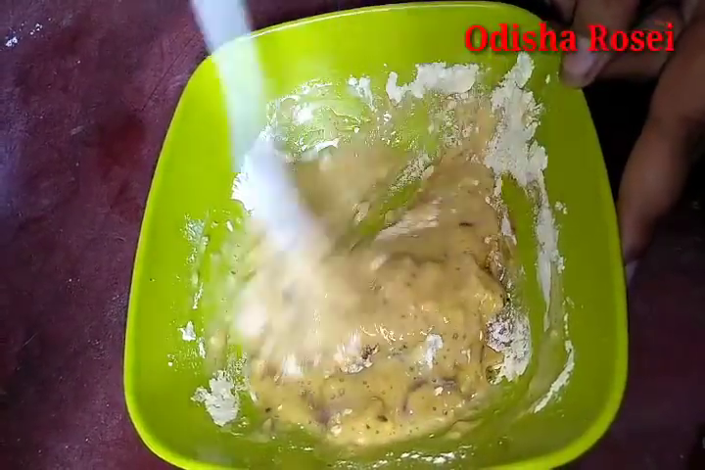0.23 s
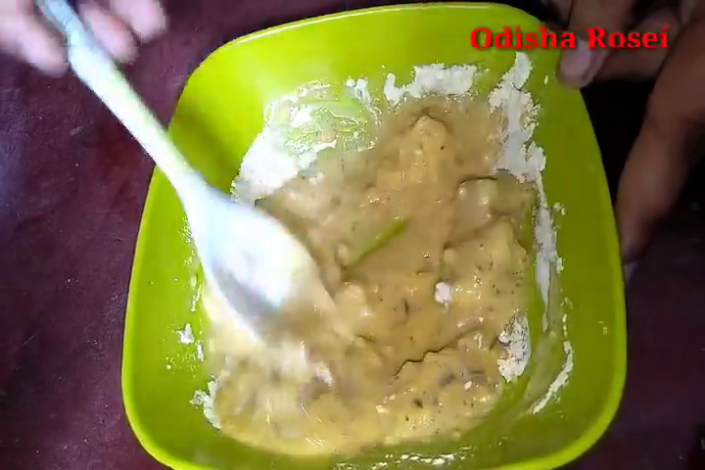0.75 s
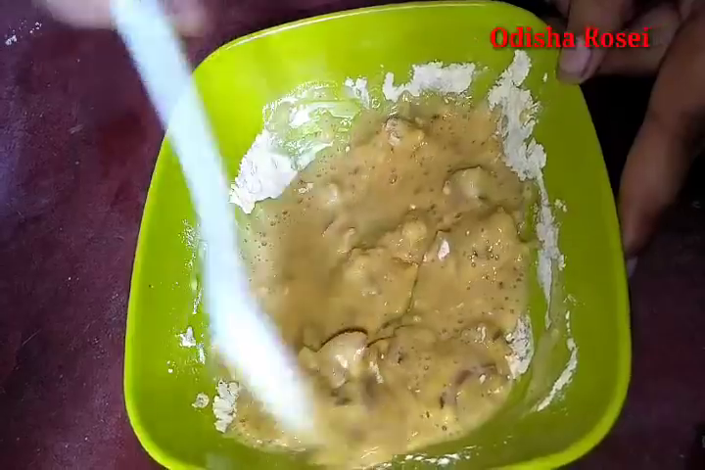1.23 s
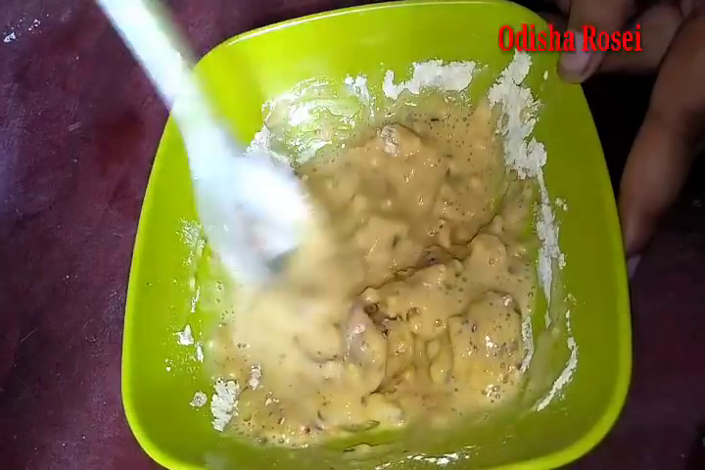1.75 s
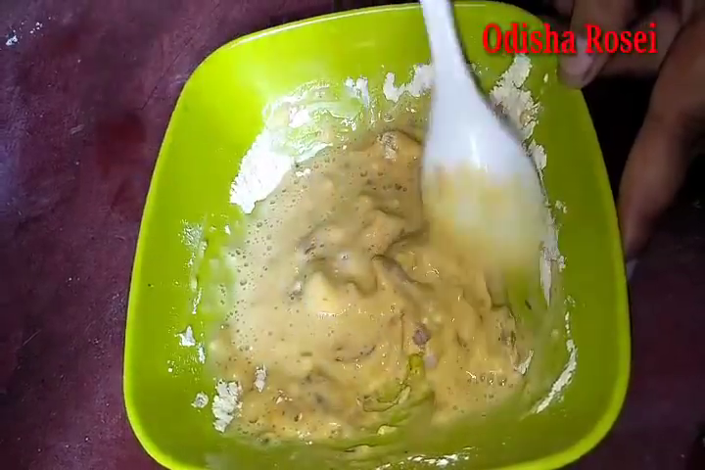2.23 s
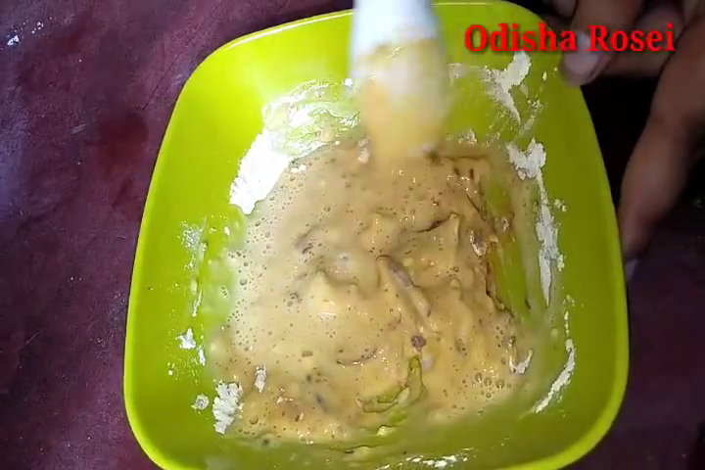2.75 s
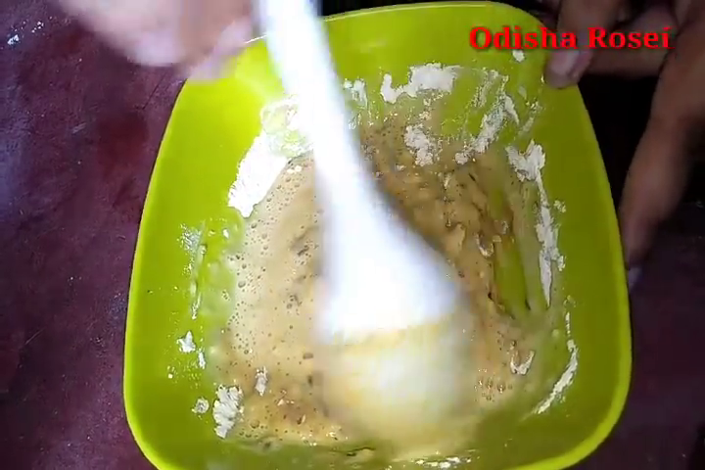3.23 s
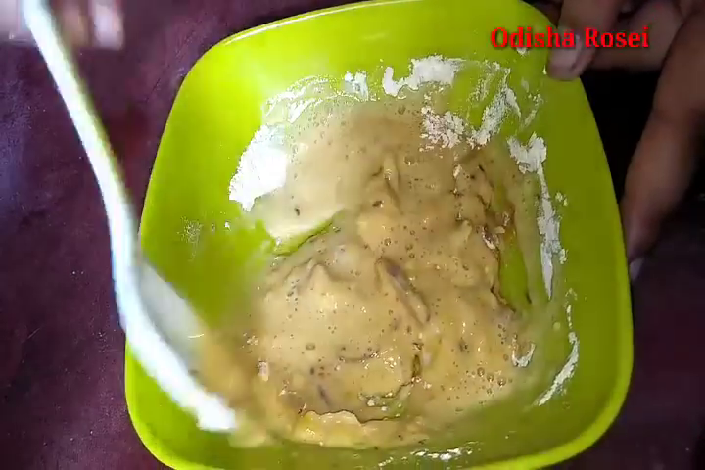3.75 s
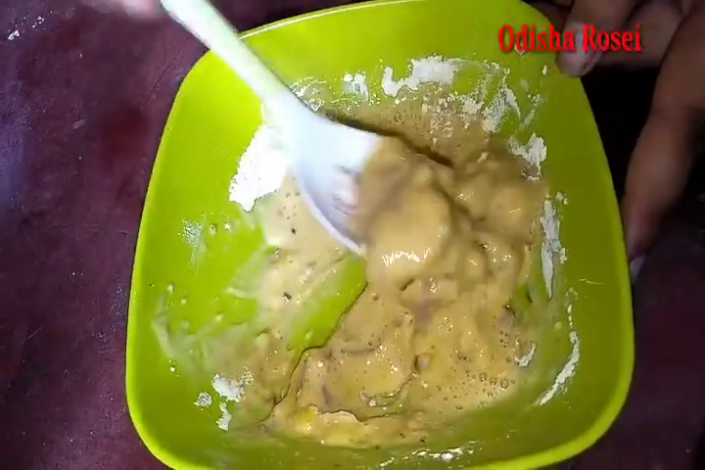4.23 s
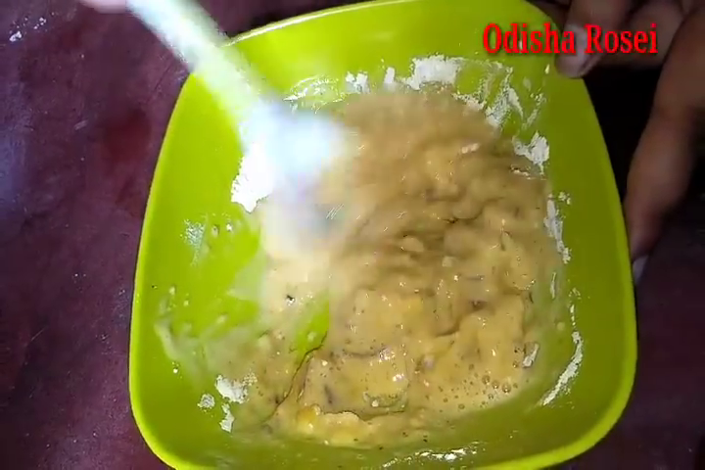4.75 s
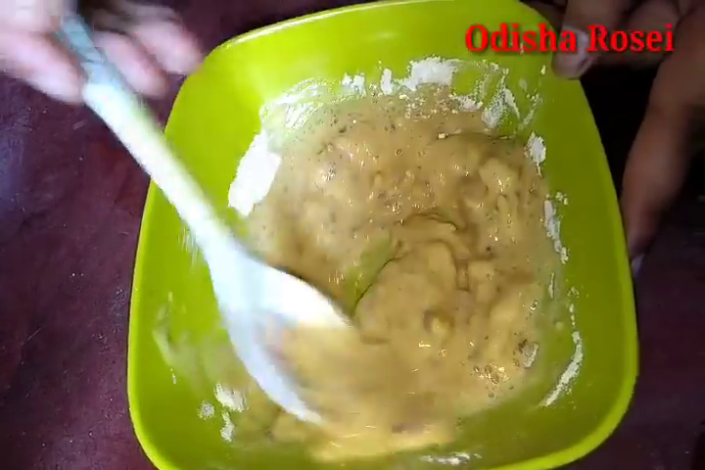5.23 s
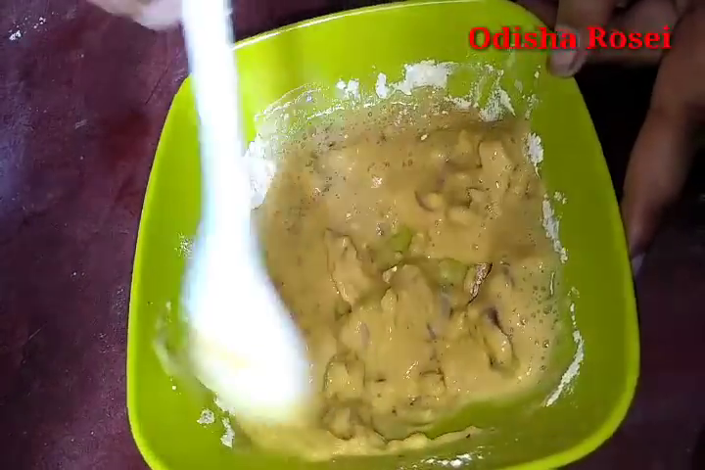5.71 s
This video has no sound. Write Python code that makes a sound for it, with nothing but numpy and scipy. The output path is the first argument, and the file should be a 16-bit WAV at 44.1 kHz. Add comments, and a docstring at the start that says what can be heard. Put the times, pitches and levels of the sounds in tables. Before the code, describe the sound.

A plastic spoon stirs thick wet batter in a plastic bowl, squelching and knocking against the wall over a faint low hum.

```python
"""A small kitchen, close to a plastic bowl in which a plastic spoon stirs thick batter.
The spoon knocks and judders on the wall and rings its damped modes, dull where batter cushions it
and sharp where it is bare. Torn air pockets ring as squelches and wet films snap as crackle.
Behind it: a low hum, faint hiss, a thin whine and one far chirp."""
import sys
import numpy as np
from scipy import signal
from scipy.fft import rfft, irfft, next_fast_len
from scipy.io import wavfile
from scipy.ndimage import map_coordinates

SR = 44100
rng = np.random.default_rng(int(sys.argv[2]) if len(sys.argv) > 2 else 0)


def wav_record(signal):
    """Record a signal, one row per channel, as 16-bit PCM in the file named by sys.argv[1]."""
    frames = np.transpose(np.atleast_2d(signal))
    bounded = np.clip(frames, -1, 1)
    # unit amplitude maps onto the largest positive 16-bit level
    quanta = np.round(bounded * 32767).astype(np.int16)
    wavfile.write(sys.argv[1], SR, quanta)


N = 263788


def amp(db):
    """Decibels to gain."""
    return 10 ** (np.asarray(db) / 20)


def unit(x):
    """Scale to rms 1."""
    return x / np.sqrt(np.mean(x ** 2) + 1e-20)


def along(points, hz):
    """Read (Hz, value) points on a log frequency axis."""
    point_hz, values = np.transpose(points)
    return np.interp(np.log(hz + 1), np.log(point_hz + 1), values)


def curves(rows):
    """One value per sample for each column after the time."""
    times_s, *columns = np.transpose(rows)
    return [np.interp(np.arange(N) / SR, times_s, column) for column in columns]


def wobble(rate_hz):
    """Smooth random curve through rate_hz knots a second."""
    knots = rng.standard_normal(int(N * rate_hz / SR) + 4)
    return map_coordinates(knots, [np.arange(N) * rate_hz / SR])


def filtered(x, response):
    """Apply a frequency response given as a function of Hz."""
    size = next_fast_len(len(x) + SR // 10)
    return irfft(rfft(x, size) * response(np.fft.rfftfreq(size, 1 / SR)), size)[:len(x)]


def noise(response):
    """Coloured noise of rms 1."""
    return unit(filtered(rng.standard_normal(N), response))


def add(track, start_s, sound):
    """Mix a sound into the track."""
    part = track[max(round(start_s * SR), 0):][:len(sound)]
    part += sound[:len(part)]


# Each row: frequency in Hz, room T60 in seconds.
ROOM_T60 = [(200, 1), (600, 0.32), (2500, 0.44), (6000, 0.05), (12000, .28)]


def kitchen_echo(x, early_db, late_db, early_t60_s=0.25, build_s=0.0026):
    """Quick scatter from floor and near walls, then the room's tail."""
    hz, t, spectra = signal.stft(rng.standard_normal(SR // 2), SR, nperseg=256)
    late_t60_s = along(ROOM_T60, hz)[:, None]
    early = amp(early_db - 60 * t / early_t60_s) / np.sqrt(early_t60_s)
    late = amp(late_db - 60 * t / late_t60_s) / np.sqrt(late_t60_s)
    tail = signal.istft(spectra * np.hypot(early, late), SR, nperseg=256)[1]
    tail *= np.sqrt(np.log(10 ** 6) / SR)  # unit energy for a 0 dB decay
    tail *= 1 - np.exp(-(np.arange(len(tail)) / SR / build_s) ** 2)
    return signal.fftconvolve(x, tail)[:N]


# Each row: frequency in Hz, relative density in dB.
RUMBLE_SPECTRUM = [(12, -24.5), (20, -7), (43, 8), (75, 2), (102, 4.5), (130, 2), (155, 3), (168, -3),
                   (188, -2.5), (219, -7), (279, -19), (313, -29), (384, -30.5), (420, -41.5), (550, -41),
                   (920, -120)]
# Each row: time in seconds, deep band and upper band levels in dB before gain_db.
RUMBLE_LEVELS = [(0.0, -54.5, -48), (0.48, -69, -59), (0.72, -59, -52), (2.9, -60, -60), (3.68, -66.5, -62),
                 (4.03, -59, -59), (4.55, -60.5, -55), (5.0, -63, -59), (5.4, -60.5, -53),
                 (5.98, -57.5, -54.5)]
# Each row: centre in Hz, level in dB.
HUM_TONES = [(55, -70), (157, -69.5)]


def hum(split_hz=90, gain_db=2, tone_width_hz=5):
    """Two wavering bands of rumble and two narrow low tones."""
    deep_db, upper_db = curves(RUMBLE_LEVELS)
    deep = noise(lambda hz: amp(along(RUMBLE_SPECTRUM, hz)) * (hz < split_hz))
    waver = amp(2.2 * wobble(16))
    upper = unit(waver * noise(lambda hz: amp(along(RUMBLE_SPECTRUM, hz)) * (hz >= split_hz)))
    tones = sum(amp(db) * noise(lambda hz: np.exp(-((hz - centre_hz) / tone_width_hz) ** 2))
                for centre_hz, db in HUM_TONES)
    return amp(deep_db + gain_db) * deep + amp(upper_db + gain_db) * upper + tones


# Each row: frequency in Hz, relative density in dB.
HISS_SPECTRUM = [(350, 8.5), (600, 1.5), (1000, -3), (2200, -11), (4000, -9), (7000, -10.5), (10000, -9.5),
                 (15500, -6)]


def hiss(level_db=-74):
    """Faint, steady broadband noise."""
    return amp(level_db) * noise(lambda hz: amp(along(HISS_SPECTRUM, hz)))


# Each row: centre in Hz, width in Hz, level in dB.
WHINE_BANDS = [(6040, 58, -81.5), (6366, 270, -80.5), (7857, 68, -85.5), (11740, 570, -90)]


def whine(flutter_db=3):
    """Narrow treble bands, each fluttering on its own."""
    track = np.zeros(N)
    for centre_hz, width_hz, db in WHINE_BANDS:
        flutter = amp(flutter_db * wobble(9))
        band = noise(lambda hz: 1 / (1 + (2 * (hz - centre_hz) / width_hz) ** 2))
        track += amp(db) * unit(flutter * band)
    return track


# Each row: time in seconds, pitch in Hz, level in dB before the direct and echo gains.
CHIRP_CONTOUR = [(1.12, 2380, -93), (1.14, 2525, -59.5), (1.165, 2756, -54), (1.19, 2724, -53),
                 (1.22, 2726, -61.5), (1.24, 2650, -56), (1.26, 2566, -63)]


def far_chirp(octave_db=-6, direct_db=-6):
    """One rough, arched chirp and its octave, heard mostly as echo."""
    pitch_hz, db = curves(CHIRP_CONTOUR)
    rasp = .05 * wobble(700)
    phase = 2 * np.pi * np.cumsum(pitch_hz * (1 + rasp)) / SR
    t = np.arange(N) / SR
    gate = (t > CHIRP_CONTOUR[0][0]) * (t < CHIRP_CONTOUR[-1][0])
    call = amp(db) * gate * (np.sin(phase) + amp(octave_db) * np.sin(2 * phase))
    return amp(direct_db) * call + kitchen_echo(call, early_db=-3.5, late_db=-4)


def bubbles(times_s, pitch_hz, size, spread, cycles, rise=0.019):
    """Opened air pockets ring, rise a little and fall 60 dB over the given cycles; rms 1."""
    t = np.arange(SR // 20) / SR
    hz = np.clip(pitch_hz * np.exp(spread * rng.standard_normal(len(times_s))), 250, 9000)[:, None]
    age = hz * t / cycles
    envelope = amp(-60 * age) * (1 - np.exp(-2 * hz * t))
    rings = envelope * np.sin(2 * np.pi * hz * t * (1 + rise * np.minimum(age, 1)))
    rings *= amp(3.6 * np.minimum(rng.exponential(size=(len(times_s), 1)), 3))  # a few stand out
    samples = (times_s[:, None] * SR).astype(int) + np.arange(len(t))
    return unit(np.bincount(samples.ravel(), rings.ravel(), size)[:size])


# Broad treble colour of the wet crackle, with peaks near 3, 8 and 12 kHz.
# Each row: frequency in Hz, relative level in dB.
CRACKLE_COLOUR = [(1500, -13), (3000, 12.5), (4000, -7.5), (5200, 3.5), (8000, 8.5), (9700, -3.5),
                  (11800, 4), (15000, -14)]


def film_crackle(times_s, pitch_hz, size, log_width=0.1407, broad_db=-21):
    """Thin films snap: clicks with one resonant peak over a broad treble colour; rms 1."""
    def colour(hz):
        peak = np.exp(-.5 * (np.log((hz + 1) / pitch_hz) / log_width) ** 2)
        return peak + amp(broad_db + along(CRACKLE_COLOUR, hz))

    samples = (times_s * SR).astype(int) + SR // 1000
    snaps = np.bincount(samples, rng.standard_normal(len(samples)), size)
    return unit(filtered(snaps, colour))


# Each row: time in seconds, wake level in dB, pitch of the hollow behind the spoon in Hz.
DRAG_PATH = [(0, -86.5, 1637), (.55, -88, 2150), (.9, -74.5, 2263), (1.1, -96, 1545), (2.07, -85, 1614),
             (3.1, -87.5, 2066), (3.45, -70.5, 2310), (3.68, -88.5, 2070), (4, -79, 1552),
             (4.26, -82, 2313), (4.6, -85.5, 2106), (5.02, -81.5, 2570), (5.4, -62.5, 2166),
             (5.56, -74.5, 2325), (5.98, -67.5, 2493)]


def spoon_drag(froth_db=-4, smear_db=-10.5, catch_db=2.5):
    """Bubbles open in the spoon's wake, pitched by its hollow; sticky films peel off the blade."""
    db, hollow_hz = curves(DRAG_PATH)
    onsets = rng.integers(0, N, size=1000)
    wake = bubbles(onsets / SR, hollow_hz[onsets], N, spread=.06, cycles=110)
    froth = bubbles(rng.uniform(0, N / SR, size=400), pitch_hz=1400, size=N, spread=0.46, cycles=94)
    snaps = np.bincount(rng.integers(0, N, size=9000), rng.standard_normal(size=9000), N)
    films = filtered(snaps, lambda hz: amp(along(CRACKLE_COLOUR, hz)))
    smear = unit(films * amp(5.3 * wobble(25)))
    spurts = unit(wake * amp(catch_db * wobble(21)))  # the blade catches and lets go
    wet = (spurts + amp(froth_db) * froth + amp(smear_db) * smear) * amp(db + 1.5 * wobble(59))
    return wet + kitchen_echo(wet, early_db=-3.5, late_db=-6.5)


def far_wall(x, delay_ms=1.364, reflection_db=-5.5):
    """The bowl's far wall adds a close copy, which makes wet sounds hollow."""
    gain = amp(reflection_db)
    combed = filtered(x, lambda hz: 1 + gain * np.exp(-2j * np.pi * hz * delay_ms / 1000))
    return combed / np.hypot(1, gain)


def tear_times(length_s, per_s, crowding=1.3):
    """Random pop times in seconds, crowded at the start of a tear."""
    return length_s * rng.random(3 + int(per_s * length_s)) ** crowding


# Larger air pockets. Each row: start in seconds, bubble level in dB, pocket pitch in Hz,
# length in seconds, crackle level in dB, crackle pitch in Hz.
AIR_POCKETS = [ (0.475, -62.5, 1570, .032, -71, 5270), (.628, -63.5, 1590, 0.031, -84, 4120),
               (0.681, -71.5, 930, 0.035, -82, 2600), (0.774, -69.5, 844, .05, -92, 2900),
               (1.316, -79, 2220, 0.037, -71.5, 5000), (1.378, -86, 2330, .013, -67, 5900),
               (1.922, -69, 2980, 0.021, -63, 11700), (1.938, -66, 5500, .008, -59, 5960),
               (1.990, -70, 5160, 0.002, -61.5, 12600), (2.288, -74, 1390, 0.027, -71, 4800),
               (2.653, -66, 2160, .012, -68.5, 4700), (3.299, -55.5, 2800, 0.025, -64, 6400),
               (3.39, -55, 925, .022, -63, 4120), (3.431, -63, 1470, .005, -57, 5470),
               (3.443, -64.5, 1660, 0.038, -63, 3780), (3.486, -53, 883, 0.033, -62.5, 4740),
               (3.52, -52, 1435, 0.023, -65, 2700), (3.746, -61, 661, .016, -76, 4570),
               (3.815, -70, 750, 0.073, -73.5, 11470), (3.866, -56.5, 2770, 0.026, -58.5, 6840),
               (3.893, -61.5, 1633, 0.058, -67.5, 6000), (4.091, -71.5, 2250, .012, -71, 3380),
               (4.733, -74.5, 1522, .055, -75, 12140), (5.2, -51.5, 923, 0.013, -63.5, 2830),
               (5.295, -41.5, 2360, 0.0043, -39.5, 6100), (5.358, -62, 1480, .008, -60, 5260),
               (5.405, -47.5, 1000, 0.0051, -53, 5140), (5.426, -53, 1486, 0.007, -60.5, 5540),
               (5.45, -54.5, 1030, 0.016, -65, 5030), (5.719, -59, 2450, 0.0069, -51.5, 7100)]


def squelches(bubbles_per_s=500, films_per_s=4500, second_ratio=1.72, second_db=-3, small_db=-8):
    """Tearing batter opens a pocket with two resonances, frees small bubbles and snaps films."""
    track, size = np.zeros(N), SR // 7
    for start_s, db, pitch_hz, length_s, crackle_db, crackle_hz in AIR_POCKETS + splats() + sucks():
        length_s = np.clip(length_s, .003, .085)
        small = bubbles(tear_times(length_s, bubbles_per_s), pitch_hz, size, spread=0.31, cycles=26)
        first, second = (bubbles(tear_times(length_s, bubbles_per_s), hz, size, spread=0.037, cycles=38)
                         for hz in (pitch_hz, second_ratio * pitch_hz))
        pops = unit(first + amp(second_db) * second + amp(small_db) * small)
        crackle = film_crackle(tear_times(length_s, films_per_s), crackle_hz, size)
        length_gain = np.sqrt(length_s * SR / size)  # refers the rms to the tear's length
        add(track, start_s, (amp(db) * pops + amp(crackle_db) * crackle) * length_gain)
    track = far_wall(track)
    return track + kitchen_echo(track, early_db=-6, late_db=-15, early_t60_s=0.27, build_s=0.0072)


def contacts(start_s, db, contact_ms, thump_db, bounces, bounce_db,
             flight_s=.0115, shrink=0.75, loss_db=1.77, soften=1.15, bare_ms=.3):
    """A knock, then a quickening, fading judder whose first bounce may be louder than the knock."""
    hits = [(start_s, db, contact_ms, thump_db)]
    if contact_ms < bare_ms:  # bare wall gives way after the click with a duller push
        hits.append((start_s + .0015, db - 7, .48, 0))
    for k in range(round(bounces)):
        start_s += flight_s * shrink ** k
        hits.append((start_s, db + bounce_db - loss_db * k, contact_ms * soften, thump_db))
    return hits


def splats(pop_db=-36.5, pop_hz=2910, length_s=0.0031, crackle_db=-45, crackle_hz=4540):
    """Squelch rows: each contact squeezes the wet wall; a quicker one is louder and crackles higher."""
    rows = []
    for *knock, _ in SPOON_KNOCKS:
        for start_s, db, contact_ms, _ in contacts(*knock):
            halvings = -np.log2(contact_ms)  # re a 1 ms contact
            force_db = db + 8.5 * halvings
            film_hz = crackle_hz * 2 ** (.15 * halvings)
            rows.append((start_s, force_db + pop_db, pop_hz, length_s, force_db + crackle_db, film_hz))
    return rows


def sucks(delay_s=0.0087, length_s=.04, pitch_hz=1554, crackle_db=-10, crackle_hz=4950):
    """Squelch rows: the spoon peels off the wall after each knock's last contact."""
    rows = []
    for *knock, suck_db in SPOON_KNOCKS:
        rest_s = contacts(*knock)[-1][0]
        rows.append((rest_s + delay_s, suck_db, pitch_hz, length_s, suck_db + crackle_db, crackle_hz))
    return rows


# Modes of the loaded bowl. Each row: frequency in Hz, relative level in dB, T60 in seconds.
BOWL_MODES = [(255, -22.5, 0.075), (321.7, -25, 0.1), (404.5, -9.5, 0.0291), (525, -8, 0.044),
              (664, -6.5, .018), (911, -0.5, 0.015), (1046, -4, 0.02), (1230, -4.5, 0.014),
              (1533, -1, 0.012), (1640, -2, 0.0099), (2147, -6, 0.028), (2600, -4, 0.014), (3250, 1, 0.004),
              (4580, -17, 0.0092), (5540, -14.5, 0.003), (6030, -22.5, 0.067), (7000, -24, 0.0031),
              (11400, -9, 0.0035)]


def bowl_ring(t, thump_db, thump_hz=650, rim_db=-26, rim_sustain=8, detune=0.02):
    """Batter damps the wall fast and retunes it at each blow; the free rim rings on faintly."""
    hz, mode_db, t60_s = np.transpose(BOWL_MODES)[:, :, None]
    polarity = (-1) ** np.arange(len(BOWL_MODES))[:, None]
    decay = amp(-60 * t / t60_s) + amp(rim_db - 60 * t / (t60_s * rim_sustain))
    shelf_db = thump_db / (1 + (hz / thump_hz) ** 4)
    strength = polarity * amp(mode_db + shelf_db + 1.7 * rng.standard_normal(hz.shape))
    tuned_hz = hz * (1 + detune * rng.standard_normal(hz.shape))
    return np.sum(strength * np.sin(2 * np.pi * tuned_hz * t) * decay, axis=0)


# Each row: frequency in Hz, relative level in dB.
CRACK_SPECTRUM = [(300, -7), (1000, 0), (3000, -2.5), (4000, -5), (6500, 0), (9700, -13.5), (12000, -1),
                  (15000, 1.5)]


def plastic_crack(t, gain_db=-3, t60_s=0.0052):
    """Plastic on plastic: a very short noise burst."""
    burst = filtered(rng.standard_normal(len(t)), lambda hz: amp(along(CRACK_SPECTRUM, hz)))
    return unit(burst) * amp(gain_db - 60 * t / t60_s)


def radiated(x, low_hz=232, gap_hz=3950, gap_q=7):
    """The wall radiates poorly in the bass and in one gap above its main modes."""
    notched = signal.lfilter(*signal.iirnotch(gap_hz, gap_q, fs=SR), x)
    return signal.sosfilt(signal.butter(2, low_hz, "highpass", fs=SR, output="sos"), notched)


# Each row: start in seconds, peak in dB, contact time in ms, low-mode thump in dB,
# bounce count (rounded), first bounce in dB re the blow, suck level in dB.
SPOON_KNOCKS = [ (.153, -37.5, 0.77, -3.5, 0, 0, -53), (.932, -40.5, 1.27, 6.5, 0, -1, -58.5),
                (1.594, -40.5, 1.56, -9, 0, 0, -71), (1.911, -48, 0.52, 24, 0, 4, -95),
                (2.1779, -31.5, 0.93, -15.5, 2.5, -16, -57), (2.502, -28.5, 0.66, 7.5, 6, -0.5, -55),
                (2.8575, -16, 0.7, -3.5, 4, -8, -65), (3.1757, -14.5, 0.15, -20.5, 0, -6, -62.5),
                (5.23, -43, .8, -6, 2, 3, -61), (5.294, -45.5, 1.04, -8, 1.5, 11, -62.5),
                (5.6234, -17.5, .15, -14, 0, 0, -61), (5.756, -25.5, .66, 1.5, 0, 0, -59),
                (5.849, -35.5, 0.43, 3, 0.5, 2.5, -61.5)]


def spoon_knocks():
    """Each contact cracks and rings the bowl; a longer, cushioned one leaves the treble out."""
    track, t = np.zeros(N), np.arange(SR // 6) / SR
    for *knock, _ in SPOON_KNOCKS:
        for start_s, peak_db, contact_ms, thump_db in contacts(*knock):
            corner_hz = np.clip(1000 / contact_ms, 200, 15000)
            cushion = signal.butter(3, corner_hz, fs=SR, output="sos")
            blow = signal.sosfilt(cushion, radiated(bowl_ring(t, thump_db) + plastic_crack(t)))
            add(track, start_s, blow * amp(peak_db) / np.abs(blow).max())
    return track + kitchen_echo(track, early_db=-3.5, late_db=-10.5, early_t60_s=0.21, build_s=0.0052)


def scene():
    """Stirring and background, mono."""
    stirring = spoon_knocks() + squelches() + spoon_drag()
    return (stirring + far_chirp() + hum() + hiss() + whine())[None]


def record(dry):
    """Band limit at 15.6 kHz."""
    return filtered(dry[0], lambda hz: hz < 15600)[None]


dry = scene()
out = record(dry)
wav_record(out)
```